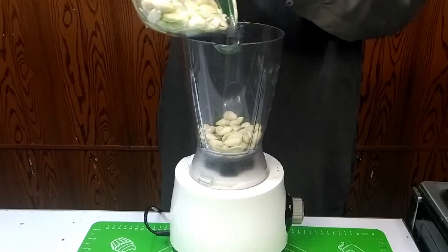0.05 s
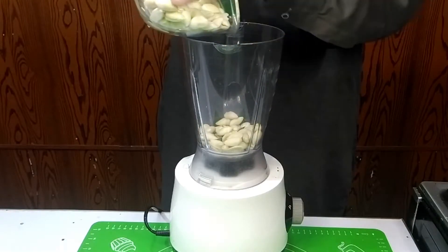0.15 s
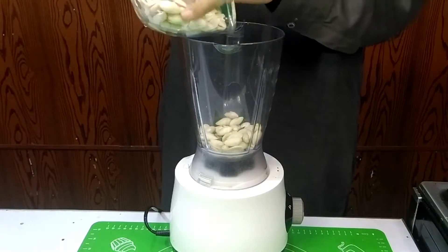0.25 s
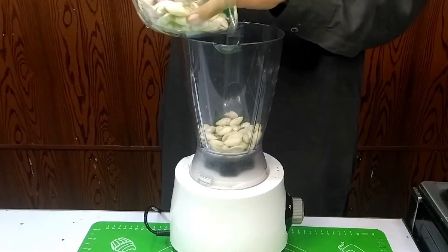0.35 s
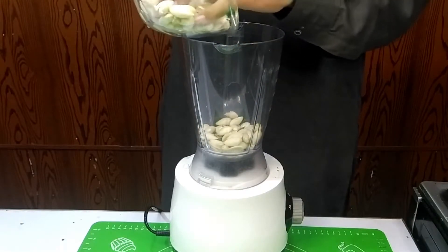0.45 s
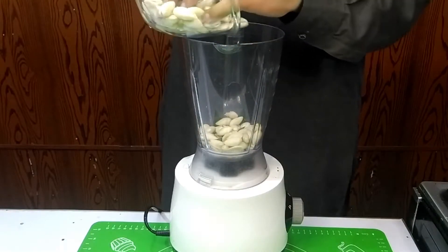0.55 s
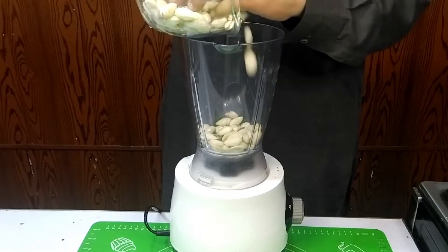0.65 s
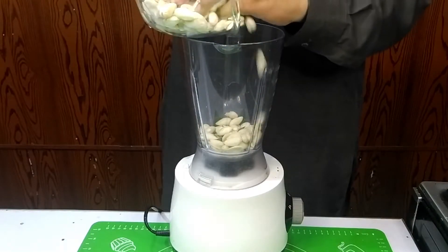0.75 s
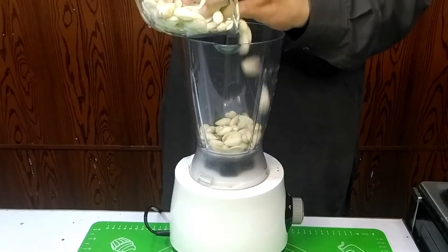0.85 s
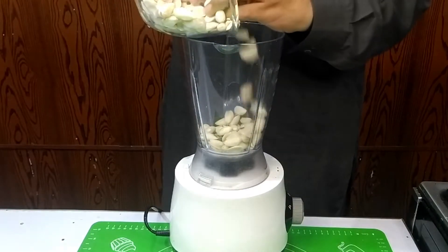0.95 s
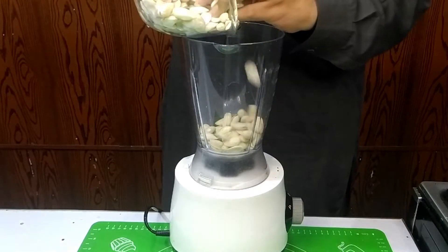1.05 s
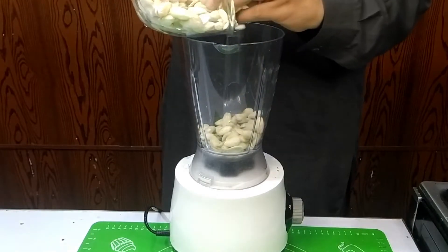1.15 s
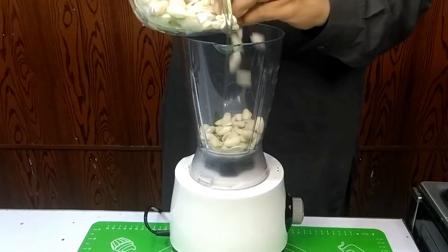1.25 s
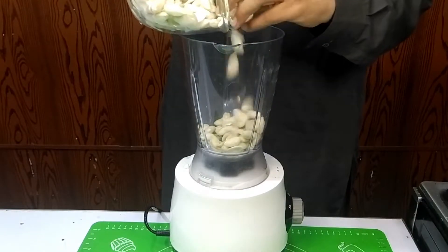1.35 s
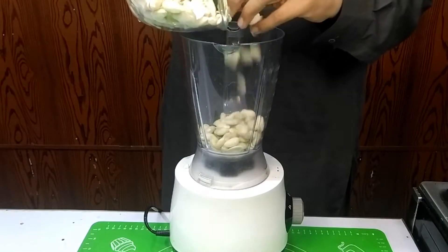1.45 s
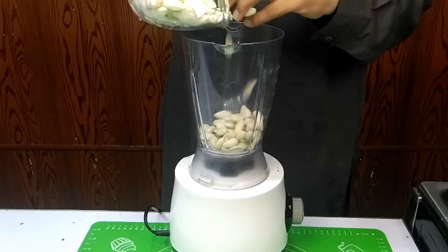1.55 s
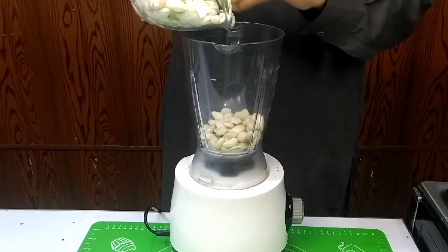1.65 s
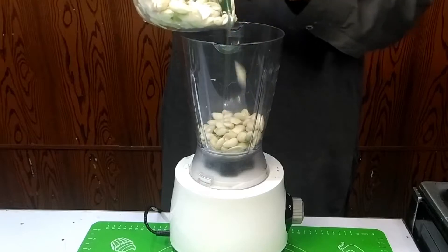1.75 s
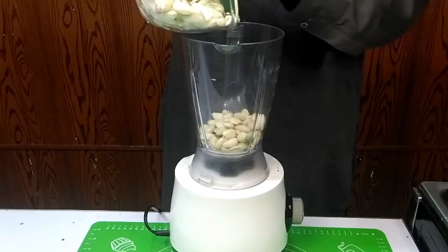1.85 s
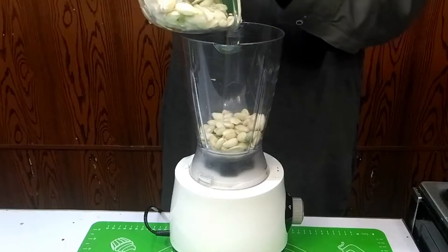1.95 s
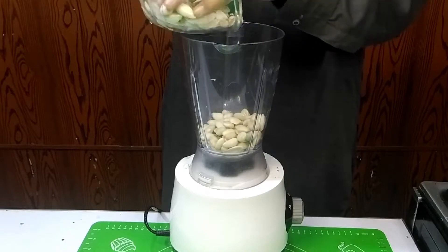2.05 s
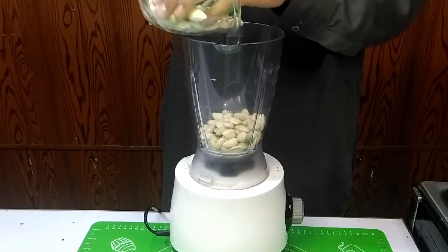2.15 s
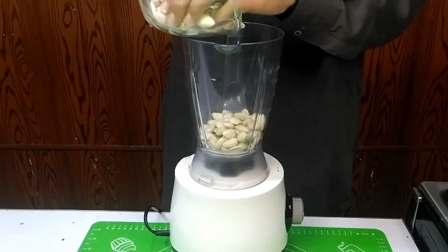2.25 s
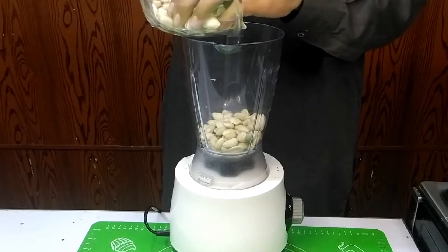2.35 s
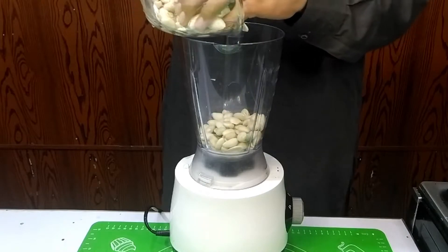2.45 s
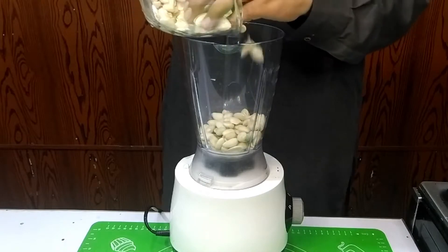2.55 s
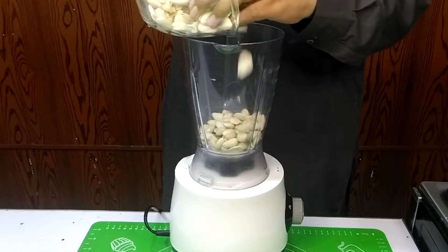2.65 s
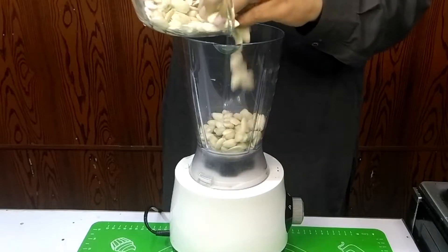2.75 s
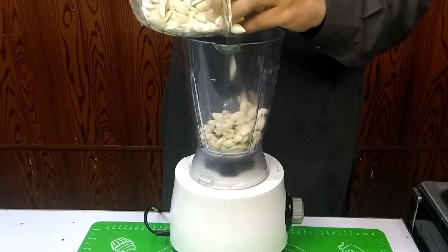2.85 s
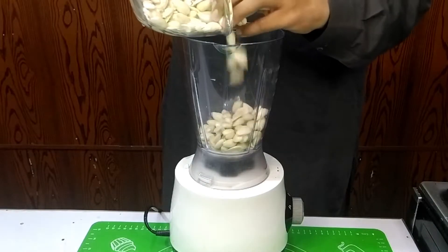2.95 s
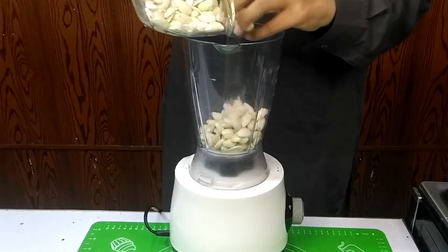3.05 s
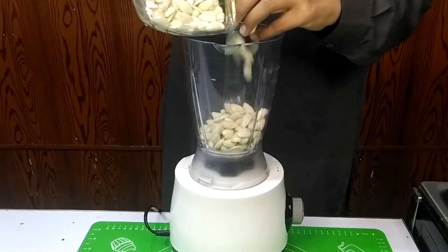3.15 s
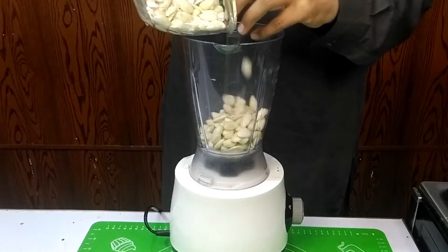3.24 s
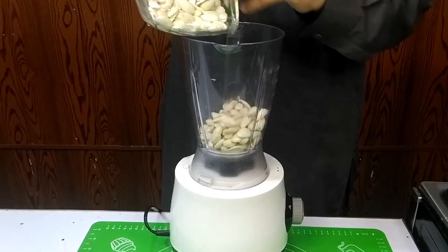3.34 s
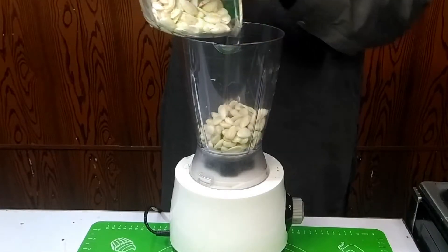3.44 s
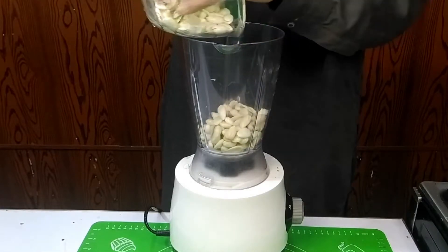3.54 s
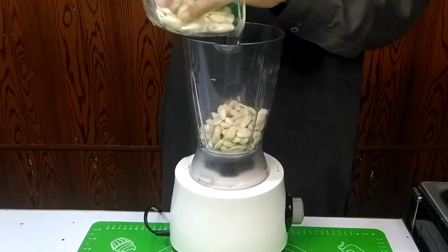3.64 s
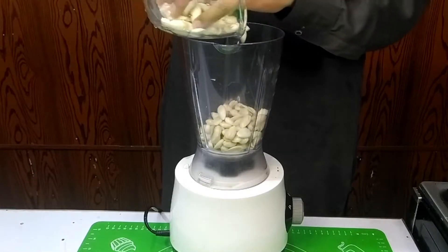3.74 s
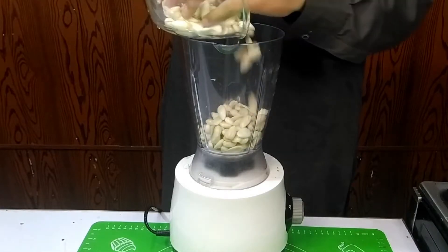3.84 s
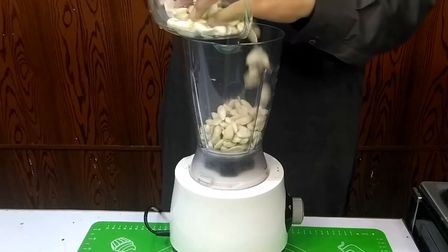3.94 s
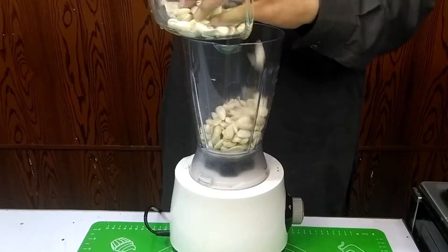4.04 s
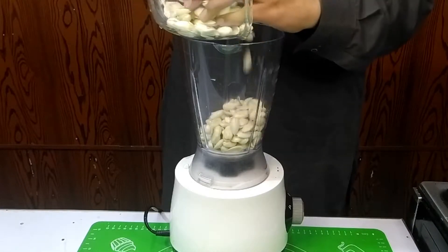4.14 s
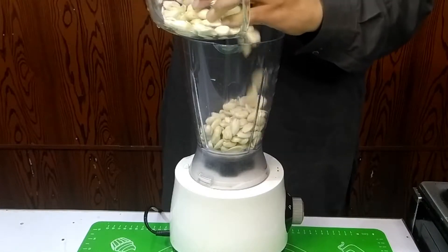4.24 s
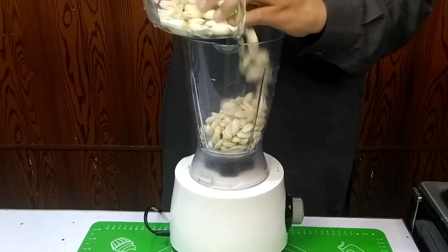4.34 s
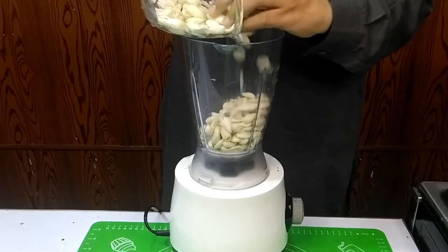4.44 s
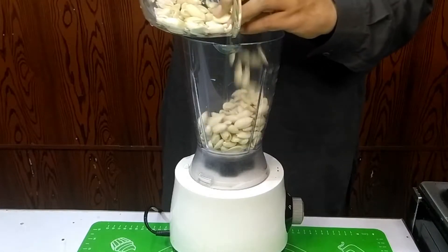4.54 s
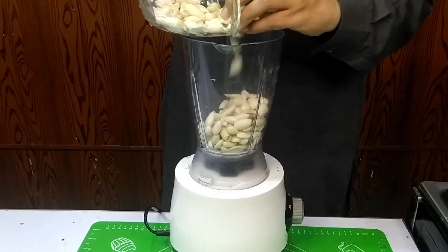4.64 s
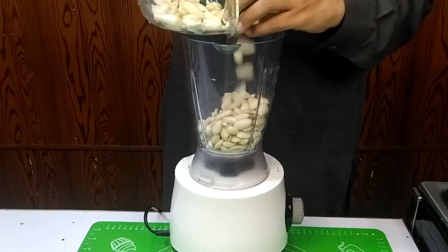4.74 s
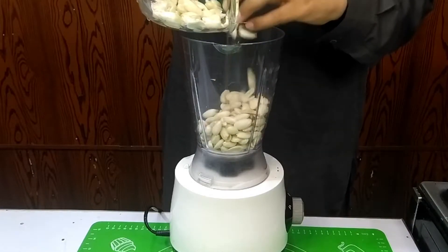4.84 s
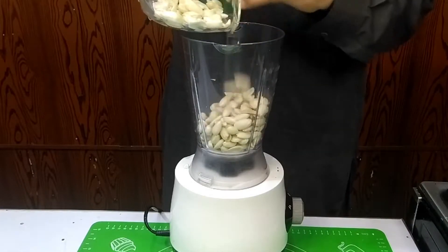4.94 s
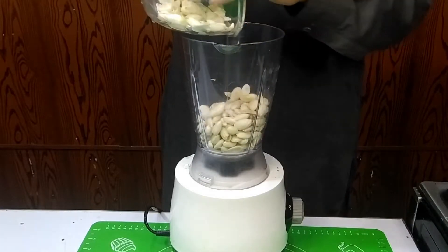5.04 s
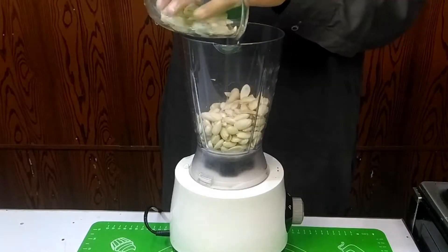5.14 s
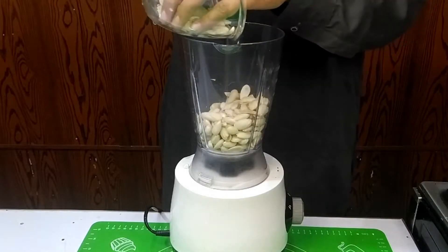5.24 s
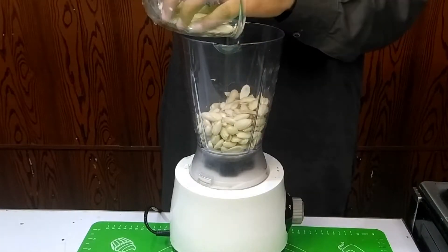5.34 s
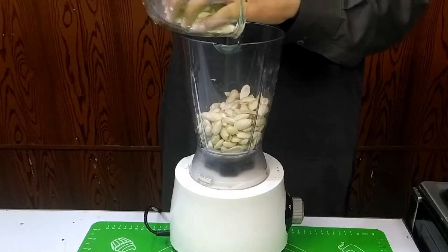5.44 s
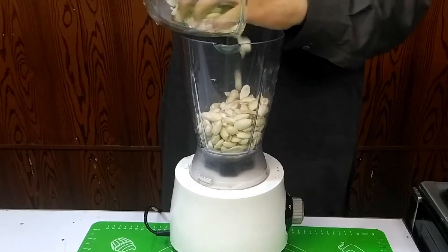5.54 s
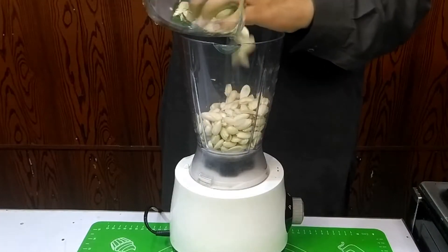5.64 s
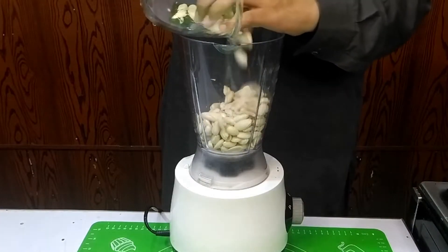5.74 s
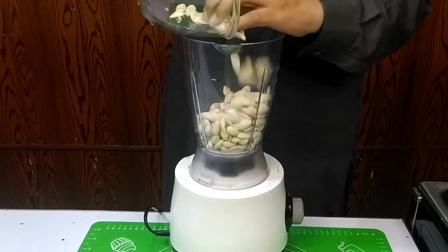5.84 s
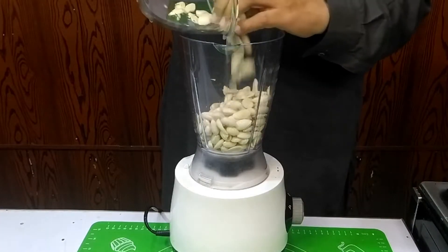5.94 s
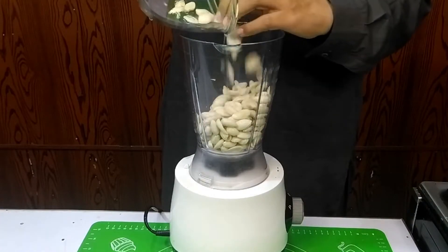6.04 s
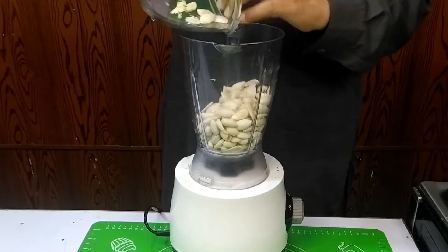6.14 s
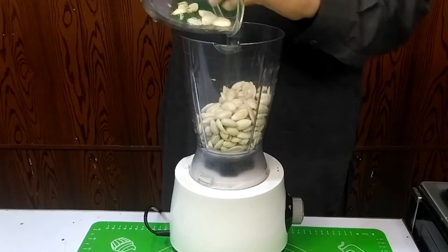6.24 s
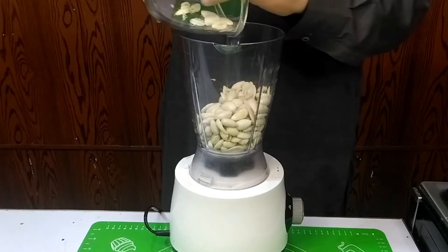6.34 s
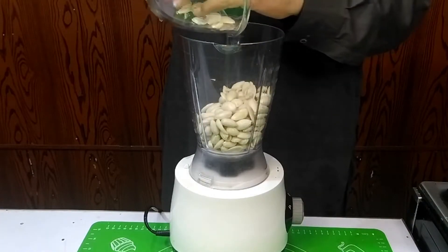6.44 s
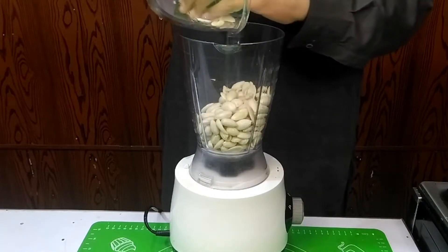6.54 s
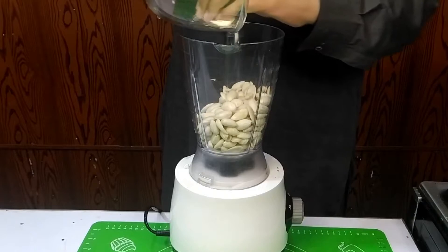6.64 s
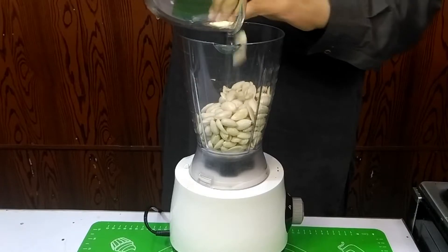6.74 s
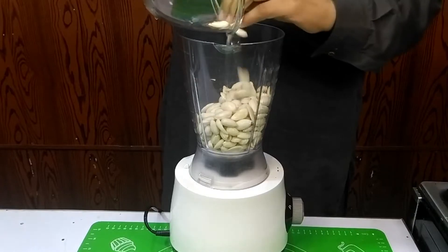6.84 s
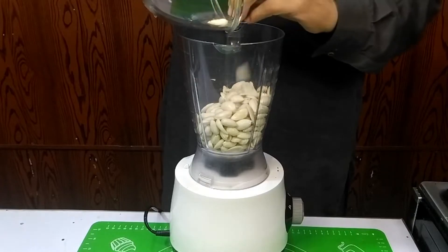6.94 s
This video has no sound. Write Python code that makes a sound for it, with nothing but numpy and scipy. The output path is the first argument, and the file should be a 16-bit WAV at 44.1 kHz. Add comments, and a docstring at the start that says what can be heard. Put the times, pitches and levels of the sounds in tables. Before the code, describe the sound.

A small kitchen with quiet low hum and rumble, captured close in mono with little high treble. At 0 s a short rustle of nuts in a glass bowl fades quickly; around 0.35 s comes a dull, soft thud. From 0.7 to 1.9 s almonds drop into a plastic blender jar: sharp hollow clacks, the loudest near 0.84 s, each followed by a brief dry rattle. A quiet gap holds a faint thud at 2.3 s. From 2.7 to 3.55 s a second burst quickens towards its end. A heavier muffled thud falls at 3.8 s, then the densest clatter runs from 3.9 to 5.05 s, with light glass taps near 4.3 s. Faint rustling follows. From 5.6 to 6.2 s a softer burst falls onto the heap, then a tiny glass tap at 6.3 s, near-quiet, and a few weak ticks around 6.8 s.

```python
"""In a small kitchen, peeled almonds are pushed by hand out of a glass bowl into a plastic blender jar.
They drop in bursts: each landing is a crack of noise, ringing jar tones and a short note, then a rattle.
Rustling is filtered random ticks; glass pings, low bumps and three distant dull thuds are fading tones.
Filtered noise makes a low rumble and the room's echo; a narrow-band microphone hears it all.
"""
import sys
import numpy as np
from scipy import signal
from scipy.fft import rfft, irfft, next_fast_len
from scipy.io import wavfile
from scipy.ndimage import uniform_filter1d, map_coordinates

SR = 44100
rng = np.random.default_rng(int(sys.argv[2]) if len(sys.argv) > 2 else 0)


def to_wav(sig):
    """Store sig (one row per channel, or 1-D mono) as 16-bit WAV at the path in sys.argv[1].

    Samples outside -1..1 are clipped; the rate is SR.
    """
    pcm = np.clip(np.atleast_2d(sig), -1, 1) * 32767
    pcm = np.round(pcm).astype(np.int16)
    wavfile.write(sys.argv[1], SR, pcm.T)  # frames by channels


N = 308061


def amp(db):
    """Turn a level in dB into a gain."""
    return 10 ** (np.asarray(db) / 20)


def unit(x):
    """Scale x to an average strength (rms) of 1."""
    return x / np.sqrt(np.mean(x ** 2) + 1e-20)


def leveled(wave, seconds):
    """Scale a wave so that its first moments have rms 1."""
    return wave / np.sqrt(np.mean(wave[:int(seconds * SR)] ** 2))


def along(points, hz):
    """Read a curve of (f/Hz, value) points, with pitch on a log axis."""
    f, value = np.transpose(points)
    return np.interp(np.log(hz + 1), np.log(f + 1), value)


def filtered(x, response):
    """Multiply the spectrum of x by a response that depends on frequency."""
    size = next_fast_len(N + SR // 2)
    spectrum = rfft(x, size) * response(np.fft.rfftfreq(size, 1 / SR))
    return irfft(spectrum, size)[..., :N]


def shaped_noise(points):
    """Make steady noise of rms 1 with the spectrum given by the points."""
    return unit(filtered(rng.standard_normal(N), lambda hz: amp(along(points, hz))))


def band(x, lo_hz, hi_hz):
    """Keep only the sound between two frequencies."""
    return signal.sosfilt(signal.butter(N=3, Wn=[lo_hz, hi_hz], btype="band", fs=SR, output="sos"), x)


def resonant(x, modes, share):
    """Let a share of x ring in an object's own tones; slow fading means a sharp peak."""
    damping = 3 * np.log(10) / np.pi  # peak width in Hz times t60

    def peaks(hz):
        total = 0
        for centre, db, t60 in modes:
            loss = 1j * hz * damping / t60
            total = total + amp(db) * loss / (centre * centre - hz * hz + loss)
        return total

    return unit(x + share * unit(filtered(x, peaks)))


def ring(modes, spread_db, attack, flutter_hz):
    """One blow: every tone starts at a new strength; close neighbours make its phase wander."""
    hz, db, t60 = np.transpose(modes)[:, :, None]
    t = np.arange(int(SR * min(t60.max(), .45))) / SR
    steps = rng.standard_normal((len(hz), len(t)))
    wander = uniform_filter1d(np.cumsum(steps, axis=1), size=400, axis=1)
    wander = wander * np.sqrt(2 * np.pi * flutter_hz / SR)
    luck, start_phase = rng.standard_normal((2, len(hz), 1))
    strength = amp(db + spread_db * luck - 60 * t / t60)
    waves = strength * np.sin(2 * np.pi * hz * t + 2 * start_phase + wander)
    return waves.sum(0) * (1 - np.exp(-t / attack))


def add(track, s, wave):
    """Mix a short wave in at time s, cutting it off at the end of the track."""
    part = track[..., round(s * SR):][..., :wave.shape[-1]]
    part += wave[..., :part.shape[-1]]


def aftermath(events, rise_s, t60, bend):
    """A loudness curve that rises after each (t/s, level/dB) event and dies away; powers add up."""
    t, power = np.arange(SR) / SR, np.zeros(N)
    shape = amp(-120 * (t / t60) ** bend) * (1 - np.exp(-t / rise_s))  # -120 because this is power
    for s, db in events:
        add(power, s, amp(2 * db) * shape)
    return np.sqrt(power)


# The pitch bands that a landing is split into: low edge f/Hz, high edge f/Hz
BAND_EDGES = [(1160, 2000), (2000, 3400), (3400, 5400), (5400, 9000)]


def colour_db(db, note_hz, below_db, above_db):
    """Level of each band of a landing: set at its loudest ring, with a slope to either side."""
    octaves = np.log2(np.sqrt(np.prod(BAND_EDGES, axis=1)) / note_hz)
    return db + below_db * np.minimum(octaves, 0) - above_db * np.maximum(octaves, 0)


# Spectrum of the room's steady hum and hiss: f/Hz, level/dB (per Hz)
FLOOR_SPECTRUM = [(12, -32.5), (20, -5), (59, -2), (70, -24.5), (86, -2.5), (119, -4.5), (170, -10.5),
                  (197, -26.5), (288, -22), (430, -27), (513, -22.5), (659, -35.5), (937, -24), (1040, -35),
                  (8150, -46), (10600, -85.5), (17900, -120)]
# Spectrum of the middle rumble: f/Hz, level/dB (per Hz)
SHAKE_SPECTRUM = [(60, -36), (110, 0), (160, -1), (280, -4), (500, -8.5), (700, -12), (950, -39),
                  (2000, -120)]
FLOOR_DB, RUMBLE_DB, SHAKEN_DB = -65.5, -72, -64.5
SHAKEN_GROWS, SHAKEN_T60_S = 0.38, 0.35  # power law of the swell, fading time


def floor():
    """Steady hum and hiss, plus a rumble that swells while landings shake jar and counter."""
    hum_and_hiss = resonant(shaped_noise(FLOOR_SPECTRUM), BOARD_TONES, share=0.17)
    landings = [(0, -49)] + [row[:2] for row in LANDINGS]  # the shaking starts with one extra push at 0 s
    shaking = aftermath(landings, .015, SHAKEN_T60_S, bend=1.1)
    swell = amp(RUMBLE_DB) + amp(SHAKEN_DB) * unit(shaking) ** SHAKEN_GROWS
    # 9 random levels a second, smoothly joined
    waver = map_coordinates(rng.standard_normal(int(N * 9 / SR) + 4), [np.arange(N) * 9 / SR])
    murmur = amp(0.74 * waver) * resonant(shaped_noise(SHAKE_SPECTRUM), BOARD_TONES, share=0.37)
    return amp(FLOOR_DB) * hum_and_hiss + swell * murmur


# Spectrum of nuts rubbing in a heap: f/Hz, level/dB (per Hz)
HEAP_SPECTRUM = [(290, -55), (500, -12), (1030, -2.5), (1210, -13.5), (1650, -11.5), (2200, -14.5),
                 (2880, -14), (3320, -15.5), (6760, -15), (7600, -13), (8150, -49.5), (10600, -75.5),
                 (17900, -120)]


def patter():
    """Many small ticks at random moments over a fine rustle excite the heap and the jar."""
    t = np.arange(800) / SR
    ticks = (rng.random(N) < 700 / SR) * amp(3.5 * rng.standard_normal(N))  # about 700 a second
    smear = amp(-60 * t / .012) * rng.standard_normal(800)  # each tick is a tiny burst of noise
    ticks = unit(signal.fftconvolve(ticks, smear)[:N]) + rng.standard_normal(N)
    body = unit(filtered(ticks, lambda hz: amp(along(HEAP_SPECTRUM, hz))))
    return resonant(body, JAR_TONES, share=.55)


# Fingers and nuts rustling in the bowl: t/s, level/dB of the dull part, bright part level/dB against it
RUSTLING = [(0, -53.5, 0), (.05, -64.5, 0.5), (.12, -89, 5.5), (.25, -100, 3), (.3, -75, 0),
            (.6, -87, -3.5), (1.9, -97, 2.5), (2.05, -81, -5), (2.3, -81, -2), (2.45, -101, 0),
            (3.7, -99, 7.5), (3.76, -79, -19), (3.9, -90.5, 6), (5.2, -84, 0), (5.4, -92, 6.5),
            (5.55, -100, 9.5), (6.75, -100, 3), (6.84, -83.5, -20), (6.99, -98.5, -16)]


def rustle(body):
    """Fingers and nuts rub in the bowl: a dull and a bright part of the patter follow drawn levels."""
    t = np.arange(N) / SR
    dull, bright = unit(band(body, 790, 4000)), unit(band(body, 3200, 7100))
    s, db, bright_db = np.transpose(RUSTLING)
    brightness = amp(np.interp(t, s, bright_db))
    return amp(np.interp(t, s, db)) * (dull + brightness * bright)


# Lone faint rings of a single tone: t/s, f/Hz, typical level/dB, t60/s (time to fade by 60 dB)
FAINT_RINGS = [(.152, 684, -50, 0.081), (.43, 2610, -88, 0.8), (.61, 1630, -72, 0.11),
               (3.57, 4375, -65, 0.22), (5.16, 4290, -80, .3), (6.8, 2920, -80, .6),
               (6.81, 2560, -75, 0.38)]


def tings():
    """Now and then one faint pure tone rings by itself and fades."""
    out = np.zeros(N)
    for s, *tone in FAINT_RINGS:
        add(out, s, ring([tone], spread_db=6.5, attack=.01, flutter_hz=60))
    return out


# Dull thuds, each a few contacts in a row: t/s, body level/dB, edge level/dB (before a common boost)
THUD_CONTACTS = [(0.333, -47.5, -59.5), (0.35, -40.5, -43.5), (0.376, -42, -73), (0.408, -51.5, -78),
                 (2.292, -52.5, -90), (2.309, -47.5, -87.5), (2.332, -53, -114), (3.781, -51, -64),
                 (3.8, -38.5, -60), (3.817, -37, -79), (3.864, -47, -98.5)]
# What the thuds ring with: f/Hz, level/dB (against each other), t60/s
BOARD_TONES = [(46.6, -9.5, 0.35), (121.6, -2.5, 0.23), (153.4, 2, 0.21), (281.3, 4.5, 0.11),
               (303, -3.5, 0.3), (345.3, 0.5, 0.28), (383.2, 3.5, 0.25), (477, 0.5, 0.26), (508.3, 1, 0.23),
               (688.3, 6, 0.1)]


def thuds():
    """Soft heavy contacts: blurred low tones and a dull puff, with a weak edge on top."""
    out = np.zeros(N)
    for s, db, edge_db in THUD_CONTACTS:
        tones = ring(BOARD_TONES, spread_db=1.0, attack=.002, flutter_hz=18)
        body = amp(db) * leveled(tones, 0.048)
        t = np.arange(len(body)) / SR
        edge_noise, hiss, puff_noise = rng.standard_normal((3, len(t)))
        puff = amp(db - 5.0 - 60 * t / 0.034) * unit(band(puff_noise, 150, 910))
        edge = band(edge_noise, 820, 2020) + 0.17 * hiss
        add(out, s, body + puff + amp(edge_db + 15.0 - 60 * t / 0.048) * edge)
    return out


# How long the room's echo lasts at each pitch: f/Hz, t60/s
KITCHEN_FADE = [(100, 0.72), (700, 0.18), (2000, 0.22), (8000, 0.36)]


def kitchen(x):
    """Each frequency of the room's answer dies at its own speed; a new tail for every stretch of sound."""
    out, step = np.zeros(N), SR // 4
    for start in range(0, N, step):
        hz, t, z = signal.stft(rng.standard_normal(SR // 2), SR, nperseg=256)
        fade = amp(-60 * t / along(KITCHEN_FADE, hz)[:, None])
        tail = signal.istft(z * fade, SR, nperseg=256)[1]
        tail = tail * (1 - np.exp(-np.arange(len(tail)) / SR / 0.00089))  # echoes take a moment to build up
        echo = signal.fftconvolve(x[start:start + step], tail / np.linalg.norm(tail))
        add(out, start / SR + .003, echo)  # the answer comes 3 ms late
    return out


# Nuts landing: t/s, level/dB, loudest ring f/Hz, fall below it and fall above it (dB per octave),
# rattle afterwards level/dB (against the landing)
LANDINGS = [(0.704, -81, 6060, 7, -1, -7), (0.721, -70.5, 6050.0, 23, -5.5, -17),
            (0.758, -76.5, 6220, 11, -2, -13), (0.779, -64, 2430, 18, 7, -12),
            (0.788, -59, 2402, 2, 16, -7), (0.7957, -45.7, 2410, 40, 10.5, -11),
            (0.8049, -42.5, 2980, 3, 13.5, -2), (0.8129, -43, 6040, 13, -1.5, -10),
            (0.8354, -28, 2885, 6.5, 15, -10), (0.9414, -47, 2860, 2.5, 4.5, 0),
            (0.9601, -44, 5800, 7, -0.5, -5), (0.9893, -43, 6520.0, 5.5, -2.5, -11),
            (0.997, -40, 1420, 5, 13, -6), (1.036, -45, 4330, 6, 3, -10), (1.0714, -51, 6850, 1, 3, -3),
            (1.106, -37, 2920, 6, 7.5, -8), (1.119, -36, 1665, 17, 4.5, -10),
            (1.18, -44.5, 1420, 5, 5, -9.0), (1.248, -61, 2270, -1, 8, -18),
            (1.295, -59, 1650, 4.6, 8, -12), (1.363, -78, 5840.0, -3, -10, -5),
            (1.381, -69.0, 1610, 0, 2.5, -3), (1.3965, -64, 5960, -2.2, -2, 4.5),
            (1.4147, -45.5, 5940, 14, -2, -5), (1.424, -40, 4860.0, 5, 10, -8.5),
            (1.446, -43, 1520, 5, 22.5, -11), (1.515, -58, 5930, 9, -7, -8),
            (1.525, -50.5, 5320, 6.5, 11, -5.5), (1.565, -53, 1300, 6.7, 17, -4),
            (1.582, -31.5, 1225, 6.7, 15.5, -5.5), (1.6062, -36.5, 2357, 1.5, 7, -4.5),
            (1.692, -39.5, 1247, 6.7, 11, -18.5), (1.714, -49, 2290, 9, 25, -15),
            (1.869, -74, 1580.0, 15.5, 1, -7), (1.886, -66.5, 1890, -8, 7.5, -15),
            (2.682, -77, 1460, 8, 3, -3), (2.7, -58.5, 2450, 11, 9.1, 2),
            (2.7189, -39, 2380, 20.5, 8.5, -13), (2.727, -38.5, 2510, 28, 11, -4.5),
            (2.7498, -44.5, 1630.0, 2, 5, -8), (2.825, -53, 1620.0, 9, 7, -13),
            (2.868, -60, 6900, 3.5, 3.1, -9.0), (2.8806, -57.3, 6960, 2.5, 2, -7),
            (2.8947, -53.5, 1950, 2, 8, -0.5), (2.932, -46.5, 6760, 18, -9, -6),
            (2.942, -47.5, 1930, -5.5, 10, -4), (2.985, -49.5, 1930, 6, 9, -21),
            (3.0212, -45, 1570, 2, 5, -5), (3.0731, -42.5, 2515, 6, 12, -4),
            (3.092, -45, 2470.0, 12, 4.5, -10), (3.107, -61, 5860.0, 2, -8.5, -14),
            (3.16, -54, 2500, 15, 11, -10), (3.188, -58.5, 1510, 14, 12, -6),
            (3.2056, -36, 1500, 5, 9.5, -7.5), (3.2328, -46.5, 1380, 6.7, 13.5, -8),
            (3.266, -35, 2330, 2, 10.5, -3), (3.286, -35, 1183, 5, 7, -9.0),
            (3.3028, -32, 1615, 6.7, 4.5, -12.5), (3.358, -49, 1620, 7, 6, -1.5),
            (3.429, -65.5, 4180, -4, 6.5, -1), (3.4474, -38.5, 1560, 7, 3, -13.5),
            (3.515, -45, 2500, 3.5, 16, -15), (3.566, -77, 1420, 6.7, 16, -12),
            (3.914, -71.5, 1630, 7.4, 10, -6), (3.928, -74, 1690.0, 2, 5, -8),
            (3.953, -62.5, 1860.0, 5, 5.5, 3), (3.972, -43, 1870, 14, 10.0, 0),
            (3.9969, -37.5, 2400, 9, 6.5, -4), (4.01, -46, 1400, 6.7, 1.5, -11),
            (4.024, -42, 1400, 6.7, 10.5, -7.5), (4.0578, -35, 1617, -1, 5, -5.5),
            (4.102, -39, 2440, 6, 3, -3.5), (4.1704, -38, 1480.0, 6.7, 3.7, -14),
            (4.188, -35.5, 1660, 18, 10.5, -6), (4.263, -47.5, 7400, 11, 6.7, -10),
            (4.293, -53, 6860, 3.7, 2, -6), (4.342, -39.5, 1277, 6.7, 16.5, -6.5),
            (4.378, -55, 7140, 14, 6.7, -17), (4.4039, -50, 1246, 8, 3, -7),
            (4.4228, -33.5, 2930, 1.5, 7.5, -3), (4.444, -36.5, 1440, 6, 4, -4),
            (4.463, -42.5, 1400, 11, 0.7, -3), (4.472, -38.5, 2890, 4, 21.5, -9.0),
            (4.506, -37, 1640, 2, 12, -9.0), (4.5331, -39.5, 1235, 6.7, 6, -6.5),
            (4.6, -50.5, 2280, -4.5, 2.5, -1), (4.653, -47, 1625, 10, 8.5, -6),
            (4.67, -46.5, 4880, 1, 9.5, -9.5), (4.75, -56, 1200, 4, 2.5, -3),
            (4.7687, -37.5, 1214, 3, 3.1, -12), (4.876, -55.5, 5350, 16, -1, -13),
            (4.937, -59, 1580, 3, 14, -5.5), (5.013, -63, 1156, 3, 9.5, -7.5),
            (5.026, -63, 7100, 20, 6.7, -4), (5.034, -56, 1205, 9, 15.5, -21),
            (5.058, -69, 6980, 12, 6.7, -9.0), (5.6145, -60.5, 2710, 3, 6, -9.5),
            (5.632, -40.5, 2750, 9.5, 11, -6.5), (5.695, -54.5, 2820, 20, 14, -10),
            (5.709, -56, 2840, 14.1, 12, -9.5), (5.718, -54.5, 1870.0, -1.5, 11, -10.5),
            (5.727, -53, 1820, 3, 13, -5), (5.76, -52, 3660, 4, 6, -8), (5.774, -50.5, 3530, 1, 3, -4.5),
            (5.791, -47.5, 6280, 4, 8, -9.0), (5.829, -47.5, 1690, 1.9, 26, -11),
            (5.857, -35.5, 1704, 28, 6, -11.5), (5.892, -47.2, 1700, -12, 7, -7),
            (5.912, -44, 4720, 2.2, 10.3, -4), (5.941, -48, 1740.0, -2, 8, -6),
            (5.98, -46.5, 1140, 6.7, 5.5, -7), (6.02, -45.5, 1610, 11, 11.5, -12),
            (6.056, -54.5, 5300, 9, -3, -5), (6.084, -47, 1205, 6, 8.5, -5.5),
            (6.1014, -48, 5080, 15, 19, -12), (6.14, -61, 5050.0, 1.5, 15, -9.5),
            (6.152, -64, 5180.0, 9, -2, -9.0), (6.1661, -64, 6400, 11, -4, -11.5),
            (6.181, -58, 1150, 6.7, 7, -9.0), (6.197, -57, 1880, -10.5, 2, -5.5),
            (6.306, -70, 4800, 1.5, 4, -12), (6.783, -69.5, 1590.0, 8, 13, -14),
            (6.8026, -58.5, 1880, -5, 29, -7), (6.845, -82, 6800, 1, 7, -7),
            (6.863, -60, 7720.0, 31, 6.7, -14), (6.881, -67, 7100, 22, 6.7, -9.0),
            (6.927, -78.5, 1840, -4, 1, -10)]
# Jar wall and its air column: f/Hz, level/dB (against each other), t60/s
JAR_TONES = [(662, 4, 0.25), (1244.5, -1.5, 0.09), (1415, -2, 0.064), (1599, 9.5, 0.021),
             (1860, -14, 0.025), (2044, -10.5, 0.025), (2381, -7.5, 0.047), (2636, -8.5, 0.032),
             (2942, -13.5, 0.065), (3665, -7.5, 0.023), (4244, -7.5, 0.022), (4800, -20.5, 0.0093),
             (6370, -11.5, 0.0067), (6880, -3.5, 0.016)]


def clacks():
    """Each landing cracks, rings the jar and sounds one short note of its own; where it lands sets the colour."""
    out = np.zeros(N)
    for s, db, note_hz, *falls_db, _ in LANDINGS:
        jar = amp(-6) * ring(JAR_TONES, spread_db=5.0, attack=0.002, flutter_hz=14)
        t = np.arange(len(jar)) / SR
        crack = amp(3 - 60 * t / .016) * rng.standard_normal(len(t)) * (1 - np.exp(-t / .0012))
        fade = amp(1.0 - 60 * t * note_hz / 48)  # falls 60 dB within 48 cycles
        note = fade * (1 - np.exp(-t / 0.00064)) * np.sin(2 * np.pi * note_hz * t)
        wave = jar + crack + note
        for level_db, edges in zip(colour_db(db, note_hz, *falls_db), BAND_EDGES):
            add(out, s, amp(level_db) * leveled(band(wave, *edges), 0.013))
    return out


# The rattle in each pitch band, low to high: extra level/dB, t60/s
RATTLE_BANDS = [(0, 0.26), (0, 0.23), (0, 0.26), (0, 0.25)]
SETTLE_RISE_S, SETTLE_BEND = 0.012, 1.29  # it holds at first, then stops ever faster


def settling(body):
    """After each landing the heap rattles on in the landing's colour."""
    levels_db = np.array([colour_db(*row) + rattle_db for s, *row, rattle_db in LANDINGS])
    times = [row[0] for row in LANDINGS]
    out = np.zeros(N)
    for db, (extra_db, t60), edges in zip(levels_db.T, RATTLE_BANDS, BAND_EDGES):
        loudness = aftermath(zip(times, db + extra_db), SETTLE_RISE_S, t60, SETTLE_BEND)
        out += loudness * unit(band(body, *edges))
    return out


AIR_HZ, AIR_DB, AIR_T60_S = (621, 797), -25, .4  # AIR_DB is against the landing's lowest band


def jar_air(body):
    """The air in the jar hums on under the rattle: a narrow band of the patter."""
    knocks = [(s, colour_db(*row)[0] + AIR_DB) for s, *row, _ in LANDINGS]
    return aftermath(knocks, SETTLE_RISE_S, AIR_T60_S, bend=1.0) * unit(band(body, *AIR_HZ))


# Soft low bumps of nuts on the jar's foot: t/s, level/dB (before a common cut)
FOOT_BUMPS = [(0.804, -46.5), (0.866, -50), (0.999, -68.5), (1.175, -76), (1.43, -75), (1.589, -49),
              (1.873, -55), (2.686, -58.5), (2.878, -48.5), (3.046, -38), (3.288, -49.5), (3.508, -51),
              (4.197, -69), (4.448, -34.5), (4.616, -73), (5.048, -56), (5.782, -55), (5.95, -44)]


def bumps():
    """The weight of landing nuts goes through the base into the counter, as blurred low tones."""
    out = np.zeros(N)
    for s, db in FOOT_BUMPS:
        tones = ring(BOARD_TONES, spread_db=4.5, attack=0.0087, flutter_hz=45)
        add(out, s, amp(db - 13.5) * leveled(tones, 0.026))
    return out


# Nuts on the glass rim: t/s, level/dB, tilt (dB per octave, around 3000 Hz)
GLASS_TAPS = [(1.298, -82, 7.5), (1.377, -74, 8), (4.297, -47.5, -1), (4.315, -45.5, 3.5), (4.347, -71, 2),
              (6.290, -73, -9), (6.306, -55.5, -1.5)]
# What the glass rings with: f/Hz, level/dB (against the tap), t60/s
GLASS_TONES = [(640, -9.5, 0.16), (1659, -2, 0.11), (3050, 0, 0.12), (4670, -2.5, 0.081), (6794, -4, 0.089)]


def pings():
    """Light taps on the glass ring a few thin tones."""
    out = np.zeros(N)
    for s, db, tilt_db in GLASS_TAPS:
        tones = [(hz, level + db + tilt_db * np.log2(hz / 3000), t60) for hz, level, t60 in GLASS_TONES]
        add(out, s, ring(tones, spread_db=5.1, attack=0.00081, flutter_hz=40))
    return out


def scene():
    """Nuts close by, thuds deeper in the room, over the rustle and the rumble."""
    nuts, far = clacks() + pings() + tings(), thuds()
    echo = kitchen(amp(-3.5) * nuts + amp(-4) * far)
    body = patter()
    heap = rustle(body) + settling(body) + jar_air(body)
    return (nuts + far + echo + heap + bumps() + floor())[None]


NARROW_HZ, TOP_HZ = 8300, 15700


def record(dry):
    """Little passes above the narrow band, only a faint trace and hiss; nothing above the top limit."""
    # what the distortion adds above the narrow band: f/Hz, level/dB
    spill = [(8800, -51.5), (9600, -37.0), (11300, -30), (12200, -48.0), (15000, -45.0)]
    narrow = filtered(dry, lambda hz: 1 / (1 + (hz / 7900) ** 60) + amp(-33.5) * (hz > NARROW_HZ))
    wide = np.diff(dry, prepend=0) * rng.standard_normal(dry.shape)  # distortion spreads loud clacks upward
    wide = filtered(wide, lambda hz: amp(along(spill, hz)) * (hz > NARROW_HZ))
    hiss = amp(-94.0) * rng.standard_normal(dry.shape)
    return filtered(narrow + wide + hiss, lambda hz: hz < TOP_HZ)


dry = scene()
out = record(dry)
to_wav(out)
```